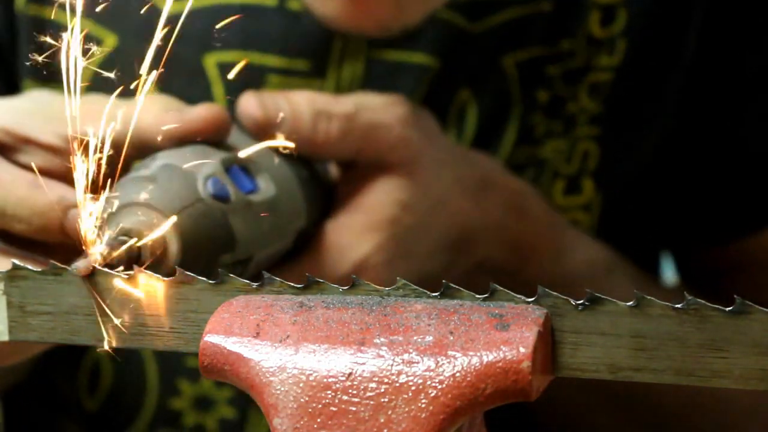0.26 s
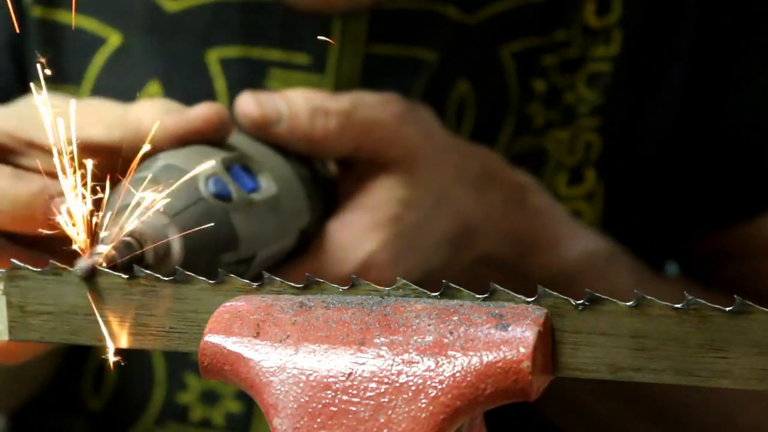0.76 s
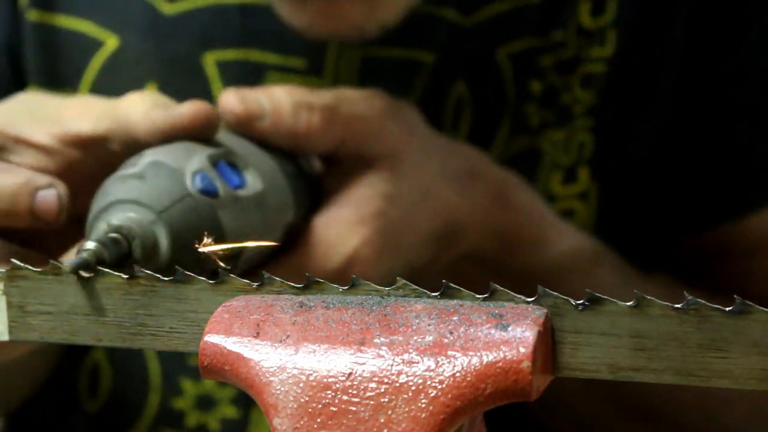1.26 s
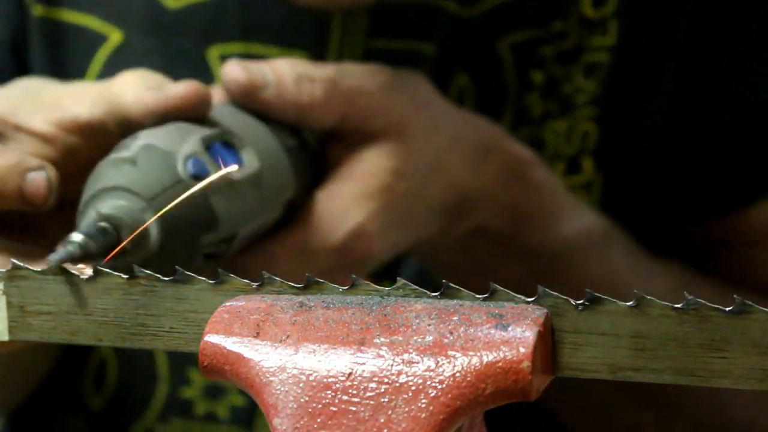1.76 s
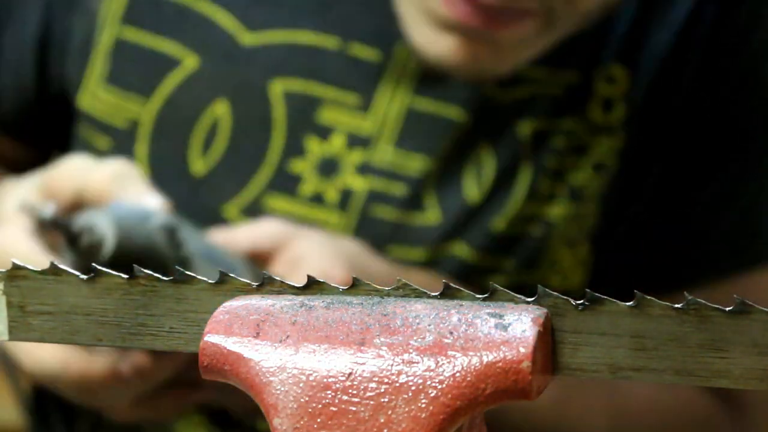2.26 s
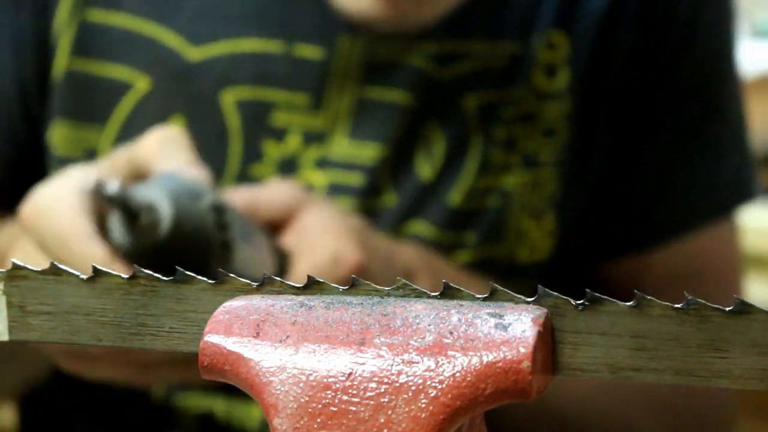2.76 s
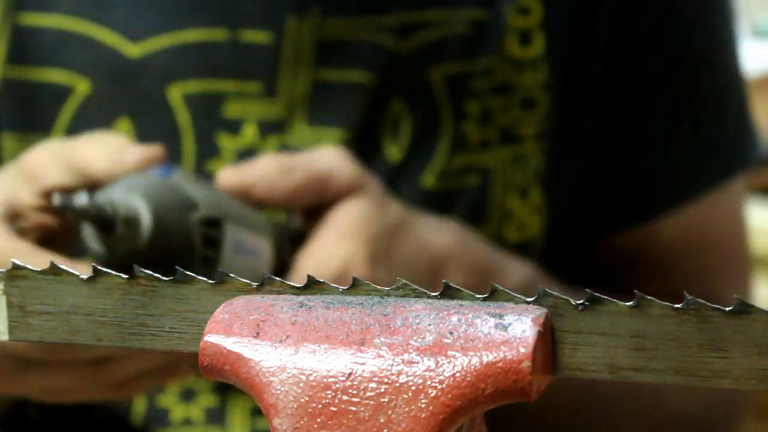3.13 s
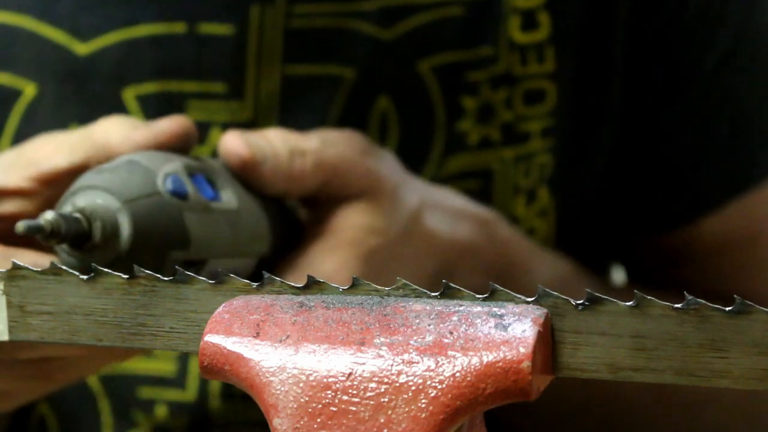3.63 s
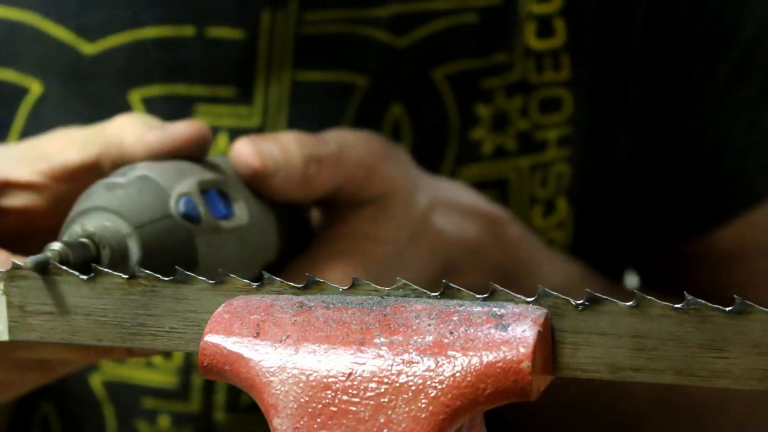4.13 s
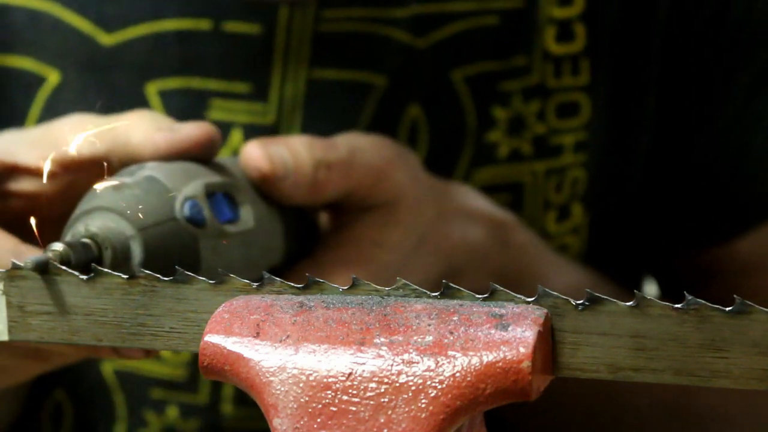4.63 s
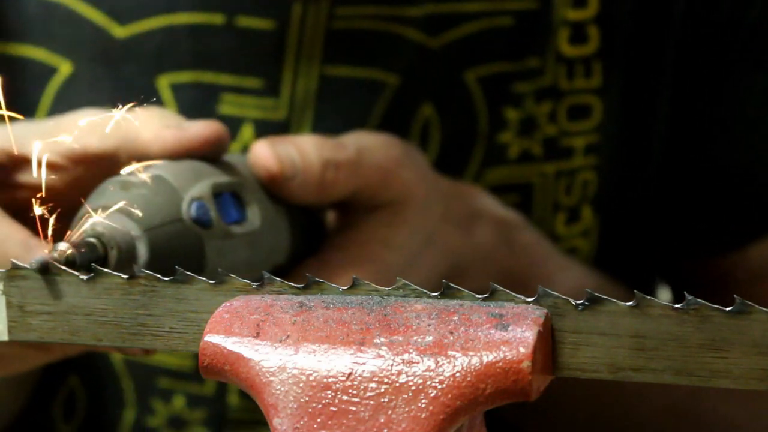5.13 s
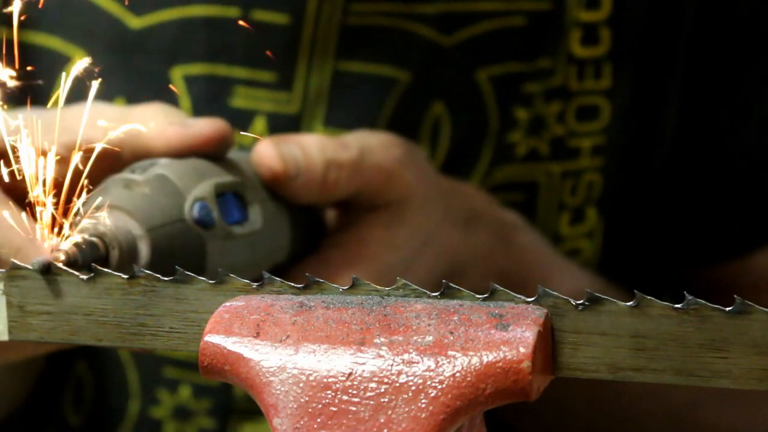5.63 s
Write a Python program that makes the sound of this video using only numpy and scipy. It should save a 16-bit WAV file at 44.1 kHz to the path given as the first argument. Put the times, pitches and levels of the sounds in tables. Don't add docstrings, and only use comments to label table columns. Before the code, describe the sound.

A quiet, hurried high whistle of a small grinder, then a sudden louder hissing whine sinking, climbing back and roughening on saw teeth.

```python
import sys
import numpy as np
from scipy import signal
from scipy.fft import rfft, irfft, next_fast_len
from scipy.io import wavfile
from scipy.ndimage import uniform_filter1d

SR = 44100
rng = np.random.default_rng(int(sys.argv[2]) if len(sys.argv) > 2 else 0)


def persist_wave(psi):
    counts = np.round(np.clip(psi, -1, 1) * 32767).astype(np.int16)
    wavfile.write(sys.argv[1], SR, np.atleast_2d(counts).T)


def gain_from_db(level_db):
    decades = np.asarray(level_db, float) / 20
    return 10 ** decades


N = 259749
T = np.arange(N) / SR
CUT_S, FASTER, FOLD_HZ = 2.3402, 6, 48000
IS_FAST = T < CUT_S
TOUCH_S = 4.43


def evened(x):
    return x / np.sqrt(np.mean(abs(x) ** 2) + 1e-20)


def read(points, hz):
    f, value = np.transpose(points)
    return np.interp(np.log(hz + 1), np.log(f + 1), value)


def curve(points, t):
    s, value = np.transpose(points)
    return np.interp(t, s, value)


def peaks_db(modes, hz):
    return sum(db / (1 + (2 * (hz - f) / width) ** 2) ** 2 for f, width, db in modes)


def flutter(width_hz):
    clock = np.cumsum(np.where(IS_FAST, FASTER, 1) * width_hz) / SR
    a, b = uniform_filter1d(rng.standard_normal((2, 4000)), size=3)
    steps = np.arange(4000) / 3
    return 1.55 * (np.interp(clock, steps, a) + 1j * np.interp(clock, steps, b))


def hand():
    sway = flutter(width_hz=11).real
    return evened(sway - uniform_filter1d(sway, size=2500))


def walls(x, t60, colour):
    t = np.arange(9000) / SR
    taps = rng.choice([-1., 1.], 9000) * (rng.random(9000) < .05)
    taps = taps * gain_from_db(-60 * t / t60) * (t > .004)
    taps = taps / np.linalg.norm(taps)
    size = next_fast_len(N + 9000)
    gain = gain_from_db(read(colour, np.fft.rfftfreq(size, 1 / SR)))
    return irfft(rfft(x, size) * rfft(taps, size) * gain, size)[:N]


# (frequency [Hz], level under the direct tones [dB])
ECHO_COLOUR = [(300, -3.5), (3000, -9.5), (12000, -8.5)]


def echoes(tones):
    return walls(tones * ~IS_FAST, 0.17, ECHO_COLOUR)


# (frequency [Hz], level under the middle [dB])
SIDE_COLOUR = [(60, -24), (200, -14), (400, -16.5), (700, -14.5), (1300, -20), (2400, -19.5), (4400, -24.5),
               (8100, -22.5), (11500, -28), (15000, -30)]


def side_walls(tool):
    wavering = np.tanh(flutter(np.where(IS_FAST, 2.5, 14)).real)
    return gain_from_db(4 + 3.7 * wavering) * walls(tool, 0.037, SIDE_COLOUR)


# (time [s], level [dB])
AIR_LEVEL = [(2.36, -23), (2.51, -25.5), (2.77, -25), (2.99, -24.5), (3.2, -20.5), (3.73, -22.5),
             (4.41, -23), (4.48, -27), (4.69, -24.5), (4.99, -23), (5.88, -22.5)]
# (time [s], level [dB])
FAST_AIR_LEVEL = [(0, -41.5), (.7, -43.5), (.87, -41), (1.0, -44), (1.42, -41), (1.85, -42), (2.33, -42)]


def loudness(t):
    return curve(AIR_LEVEL, t), curve(FAST_AIR_LEVEL, t)


# (lower edge [Hz], upper edge [Hz])
NOISE_BANDS = ((100, 1000), (1800, 7000), (7500, 15500))


def hiss(colour_db, bands_db, hz, t):
    a, b, patches = rng.standard_normal((len(t), len(hz), 3)).T
    patches = uniform_filter1d(uniform_filter1d(patches, size=30, axis=0), size=6, axis=1)
    patches = evened(patches)
    lift_db = 0
    for (lo, hi), db, weights in zip(NOISE_BANDS, bands_db, ((1, 0, 0, 0), (0, 1, 1, 0), (0, 0, 0, 1))):
        held_db = 10 * np.log10((gain_from_db(colour_db[(hz > lo) & (hz < hi)]) ** 2).sum(0))
        share = read(list(zip((700, 2500, 6500, 8500), weights)), hz)
        lift_db = lift_db + share[:, None] * (db - held_db)
    z = (a + 1j * b) * gain_from_db(colour_db + lift_db + 1.54 * patches - 1.07)
    return signal.istft(z, nperseg=2048, noverlap=1536)[1][:N]


# (frequency [Hz], density [dB per Hz])
FREE_COLOUR = [(30, -54), (52, -49), (100, -27.5), (250, -13.5), (425, -9), (680, -12.5), (1300, -4),
               (1750, -4), (2250, 2), (3850, 0), (4630, -0.5), (5560, 6), (7620, -4), (15900, -8.5)]
# (frequency [Hz], density [dB per Hz])
GRIND_COLOUR = [(30, -63), (55, -58), (100, -33.5), (190, -24.5), (485, -17), (900, -18), (1200, -6),
                (1700, -11.5), (2300, -3), (3850, -10), (5400, -3), (7600, -6.5), (11200, -10),
                (15900, -12)]
# (frequency [Hz], density [dB per Hz])
FAST_COLOUR = [(25, -6), (70, -6), (934, -5.5), (1280, -5.5), (2220, -7.5), (5860, -7), (6800, -2),
               (7600, -7), (9410, -10), (12500, -6.5), (14500, -6), (15900, -6)]
# (frequency [Hz], width [Hz], lift [dB])
BLADE_MODES = [(1400, 21, 11.5), (3780, 830, 11.5), (5974, 200, 10), (11170, 60, 4), (11790, 360, 17.5)]
# (frequency [Hz], width [Hz], lift [dB])
ROOM_MODES = [(71.3, 30, 40), (132.7, 30.8, 19), (217.4, 10.85, 9), (296, 26, 8.5), (776, 15, 3)]


def air(angle):
    hz = np.fft.rfftfreq(2048, 1 / SR)[:, None]
    t = np.arange(N // 512 + 5) * 512 / SR
    touch = np.clip((t - TOUCH_S) / 0.14 + .5, 0, 1)
    grind_db = read(GRIND_COLOUR, hz) + .7 * peaks_db(BLADE_MODES, hz)
    slow_db = read(FREE_COLOUR, hz) * (1 - touch) + grind_db * touch + peaks_db(ROOM_MODES, hz)
    mid_db, fast_db = loudness(t)
    late = ~IS_FAST
    slowed = SPEED_AT_OFF - np.interp(t, T[late], speed()[late])
    low_db = -17.5 + 0.039 * slowed
    high_db = -4.5 + touch * (3.5 + .3 * np.interp(t, T, pressure()))
    slow = hiss(slow_db, (mid_db + low_db, mid_db, mid_db + high_db), hz[:, 0], t)
    fast_bands_db = (fast_db - 10, fast_db, fast_db + 5.5)
    fast = hiss(read(FAST_COLOUR, hz) + 0 * t, fast_bands_db, hz[:, 0], t)
    puffs = 1 + 0.074 * np.clip((T - TOUCH_S) / .1, 0, 1) * np.cos(angle)
    return np.where(IS_FAST, fast * gain_from_db(0.62 * hand()), slow * puffs * gain_from_db(2.22 * hand()))


# (time [s], level [dB], frequency [Hz], length [s])
DULL_WHISTLES = [
    (0.337, -45, 1284, 0.055),
    (0.419, -41, 1570, 0.012),
    (0.806, -46.5, 1255, 0.15),
    (1.072, -47, 1650, 0.016),
    (1.89, -45, 550, 0.031),
]


def whistles():
    out = 0
    for s, db, hz, length in DULL_WHISTLES:
        swell = gain_from_db(db) * np.exp(-2.8 * ((T - s) / length) ** 2)
        out = out + swell * (np.exp(2j * np.pi * hz * T) * flutter(width_hz=18)).real
    return out


# (start [s], end [s], rate [strokes per s], swing [turns per s], time of a crest [s])
HAND_STROKES = [
    (0, 0.245, 21.9, 2.9, 0.019),
    (0.414, 0.538, 19.3, 1.5, 0.37),
    (0.898, 1.091, 18.1, 2.9, .8862),
    (1.078, 1.25, 19.1, 2.6, 1.1044),
    (1.44, 2.078, 6.6, 0.63, 1.5),
]


def strokes():
    out = np.zeros(N)
    for start, end, per_s, swing, crest in HAND_STROKES:
        inside = np.clip(np.minimum(T - start, end - T) / (.15 * (end - start)), 0, 1)
        out += swing * inside * np.cos(2 * np.pi * per_s * (T - crest))
    return out


# (time [s], speed [turns per s])
LOADED_SPEED = [(0, 544.7), (.241, 539.3), (.458, 551.6), (.718, 522.8), (.777, 542.4), (.861, 555.1),
                (1.033, 557.1), (1.237, 547.7), (1.483, 563.1), (1.88, 564.4)]
# (time [s], gain [turns per s], rise [s], fall [s])
LIFT_OFFS = [
    (.329, 14.8, .042, .068),
    (.613, 35.5, .066, .176),
    (1.311, 26.5, .05, .092),
    (2.157, 7.25, .063, .081),
    (2.314, 5.7, .056, .073),
]
# (time [s], loss [turns per s])
GRIND_SAG = [(4.13, 0), (4.252, 2.45), (4.393, 11.06), (4.631, 30.2), (4.837, 38.1), (5.505, 44.8),
             (5.885, 51.7)]
SPEED_AT_OFF, SPEED_FREE = 567.4, 596.1


def speed():
    off_s, on_s, coast_s, run_up_s, soft_start_s = 2.375, 3.002, 1.67, .39, .175
    fast = curve(LOADED_SPEED, T)
    for s, gain, rise, fall in LIFT_OFFS:
        fast = fast + gain * np.exp(-((T - s) / np.where(T < s, rise, fall)) ** 2)
    coast = SPEED_AT_OFF * np.exp(-(np.clip(T, off_s, on_s) - off_s) / coast_s)
    on = np.maximum(T - on_s, 0)
    lack = run_up_s * np.exp(-on / run_up_s) - soft_start_s * np.exp(-on / soft_start_s)
    lack = lack / (run_up_s - soft_start_s)
    slow = SPEED_FREE - (SPEED_FREE - coast) * lack - curve(GRIND_SAG, T)
    return np.where(IS_FAST, fast, slow)


def shaft():
    hz = uniform_filter1d(speed(), size=600) + strokes()
    return 2 * np.pi * np.cumsum(hz * np.where(IS_FAST, FASTER, 1)) / SR


def order(k, angle, level, rough, width_hz):
    folds = np.round(k * FASTER * 560 / FOLD_HZ) * IS_FAST
    heard = k * angle - 2 * np.pi * FOLD_HZ * folds * T
    unsteady = (1 + rough * flutter(width_hz)) / np.hypot(1, rough)
    tone = np.exp(1j * (heard + k ** 2 / 2)) * unsteady
    return np.sqrt(2) * level * tone.real


# (shaft order, level played fast [dB], rise with speed [dB per turn per s],
# level over the fan noise running free [dB], the same near the steel [dB])
STRONG_TONES = [(1, -63.5, 0, -24, -21), (3, -49.5, 0.54, -7.5, -18), (8, -55, -2, -10, -12.5),
                (12, -48, .5, -8, -11), (24, -35.5, 0, -4, 2)]
# (time [s], shaft order, change [dB], length [s])
TONE_SWELLS = [(0.502, 24, 6, .05), (.5, 12, 3, 0.073), (0.628, 12, 5, 0.034), (.98, 24, 6, .06),
               (2.449, 12, -5, 0.13), (1.298, 24, 7, 0.036), (3.306, 1, 3, 0.58), (2.418, 8, -7, .1),
               (2.26, 24, 7.5, 0.082), (2.422, 24, 10, 0.056), (2.486, 3, -11, 0.033), (2.613, 3, 10, 0.02),
               (2.79, 3, 6, 0.039), (2.804, 12, 3.5, 0.09), (2.922, 3, -12, .06), (3.004, 12, -34, 0.084),
               (3.124, 3, -23, .03), (3.1, 8, 4, 0.054), (3.333, 12, 6.5, 0.38), (3.604, 24, 6, 0.31),
               (3.748, 8, -8, 0.13), (4.064, 8, -27, 0.16), (4.229, 3, 11, 0.092), (4.215, 24, 3, 0.16),
               (4.667, 3, 11, 0.047), (4.746, 24, -7, 0.072), (4.72, 12, 9, .05), (5.52, 24, -6, 0.27),
               (5.63, 24, 3.5, 0.066), (5.672, 3, 7, 0.026)]


def main_tones():
    gained = speed() - 557.8
    mid_db, fast_air_db = loudness(T)
    near = np.clip((T - 3.71) / 0.32 + .5, 0, 1)
    out = {}
    for k, fast_db, slope, free_db, near_db in STRONG_TONES:
        slow_db = mid_db + free_db + (near_db - free_db) * near
        out[round(k)] = np.where(IS_FAST, fast_db + slope * gained, slow_db)
    for s, k, db, length in TONE_SWELLS:
        out[round(k)] = out[round(k)] + db * np.exp(-((T - s) / length) ** 2)
    return out


# (shaft order, level over its middle band [dB])
WEAK_TONES = [(2, -36), (4, -27), (5, -18), (6, -32), (7, -19.5), (16, -23.5), (21, -35), (23, -36),
              (25, -31)]


def motor(angle):
    main = main_tones()
    mid_db, fast_air_db = loudness(T)
    air_db = np.where(IS_FAST, fast_air_db, mid_db)
    minor = {round(k): db + air_db for k, db in WEAK_TONES}
    beside = {13: main[12] - 18}
    rough, out = np.where(IS_FAST, .4, .15), 0
    for k, db in {**main, **minor, **beside}.items():
        chopped = 0.47 * (k == 8)
        out = out + order(k, angle, gain_from_db(db + 1.57 * hand()), rough + chopped, width_hz=30)
    return out


# (time [s], pressure [dB])
BIT_PRESSURE = [
    (2.34, -24),
    (4.04, -11.5),
    (4.3, -9.5),
    (4.7, -10),
    (5.1, -8),
    (5.88, -9),
]
# (time [s], pressure [dB])
FAST_BIT_PRESSURE = [(0, -8.5), (.31, -9), (.6, -7.5), (.72, -6.5), (.9, -13), (1.28, -11), (1.34, -28),
                     (1.4, -7.5), (2.15, -12), (2.22, -16), (2.28, -7)]


def pressure():
    since = T - TOUCH_S
    rock_db = 4 * np.clip(since / 0.12 + 1, 0, 1) * np.exp(-np.maximum(since, 0) / 1.42)
    slow = curve(BIT_PRESSURE, T) + rock_db * np.cos(2 * np.pi * 3.02 * (T - 4.67))
    return np.where(IS_FAST, curve(FAST_BIT_PRESSURE, T), slow)


def ring():
    ring_hz, width_hz, first_touch_s = 10920, 33, 3.7
    touching = np.clip((T - first_touch_s) / .02, 0, 1)
    level = touching * gain_from_db(-26.5 + 0.85 * pressure() + 3.0 * hand())
    return level * (np.exp(2j * np.pi * ring_hz * T) * (0.51 + flutter(width_hz))).real


# (shaft order, level at true speed [dB], level played fast [dB])
KNOCKS = [(1, -56, -49.5), (2, -32.5, -39), (4, -32, -40), (5, -37.5, -70), (6, -33, -70), (7, -41.5, -69),
          (9, -37, -70), (10, -29.5, -44), (11, -35.5, -43.5), (13, -53, -55), (14, -36, -53.5),
          (15, -36.5, -55), (16, -56, -109), (17, -37.5, -80), (18, -41, -62), (19, -57, -70),
          (20, -32, -70), (21, -47, -64), (22, -47, -72), (23, -55, -70), (25, -47, -46.5), (26, -37, -59),
          (27, -50, -81), (28, -49, -95)]
KNOCK_ROUGHNESS = {1: 0.052, 2: 0.36, 7: 0.94}
# (time [s], shaft order, level [dB],
# length [s])
KNOCK_FLARES = [(5.48, 1, -45, 1.15), (5.15, 5, -32, 0.12), (4.08, 6, -24, 0.048),
                (4.68, 2, -26.5, 0.11), (4.5, 7, -36, 0.28), (4.447, 2, -28.5, 0.17),
                (4.45, 4, -30.5, 0.21), (4.438, 9, -27.5, 0.031), (4.448, 19, -19, 0.036),
                (4.49, 6, -24.5, 0.12), (4.603, 5, -31, 0.085), (4.675, 21, -27, 0.065),
                (4.724, 5, -26.5, 0.13), (4.8, 20, -29, 0.03), (4.804, 6, -30, 0.029),
                (4.805, 2, -27, 0.065), (4.925, 1, -32.5, 0.093), (5.088, 7, -27, 0.025),
                (5.28, 4, -31, 0.085), (5.272, 20, -32, 0.055), (6.1, 7, -26, 0.052),
                (4.31, 2, -38, 0.06), (5.514, 7, -28, 0.057), (5.54, 5, -25, 0.064),
                (5.574, 1, -34.5, 0.074), (5.593, 11, -24, 0.024), (5.774, 7, -26.5, 0.082),
                (5.79, 11, -24.5, 0.1), (5.832, 5, -24.5, 0.14), (5.844, 6, -28, 0.055)]


def bit(angle):
    pressure_db = pressure() + np.where(IS_FAST, 2.95 * hand() + 0.86 * strokes(), 0)
    turns, out = np.gradient(angle) * SR / (2 * np.pi), 0
    for k, slow_db, fast_db in KNOCKS:
        k = round(k)
        slow_db = slow_db + 1.5 + peaks_db(BLADE_MODES, k * turns)
        grit_db = 4 * (k > 1) * flutter(width_hz=20).real
        power = gain_from_db(np.where(IS_FAST, fast_db, slow_db) + pressure_db + grit_db) ** 2
        for s, flare_order, db, length in KNOCK_FLARES:
            if round(flare_order) == k:
                near = slice(round((s - 2 * length) * SR), round((s + 2 * length) * SR))
                power[near] += gain_from_db(db) ** 2 * np.exp(-8 * ((T[near] - s) / length) ** 4)
        out = out + order(k, angle, np.sqrt(power), rough=KNOCK_ROUGHNESS.get(k, .3), width_hz=60)
    return out


def scene():
    angle = shaft()
    tones = motor(angle) + bit(angle) + ring()
    tones += echoes(tones)
    tool = tones + air(angle) + whistles()
    side = side_walls(tool)
    return np.array([gain_from_db(-0.7) * (tool + side), gain_from_db(0.14) * (tool - side)])


def roll_off(x):
    return signal.sosfilt(signal.butter(12, 16050, fs=SR, output="sos"), x)


def record(dry):
    band_limit = signal.firwin(801, 15720, window=("kaiser", 9), fs=SR)
    mix = signal.oaconvolve(dry, band_limit[None], "same")
    return roll_off(mix)


dry = scene()
out = record(dry)
persist_wave(out)
```